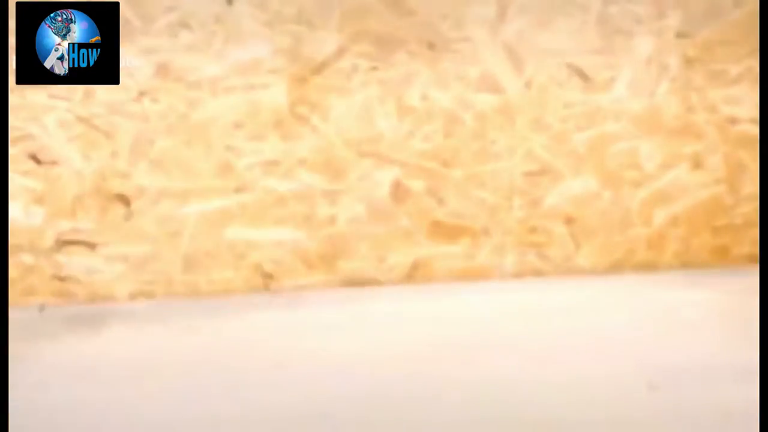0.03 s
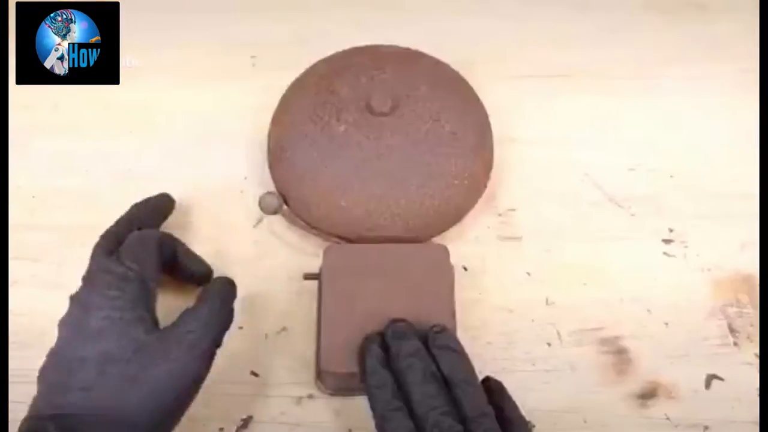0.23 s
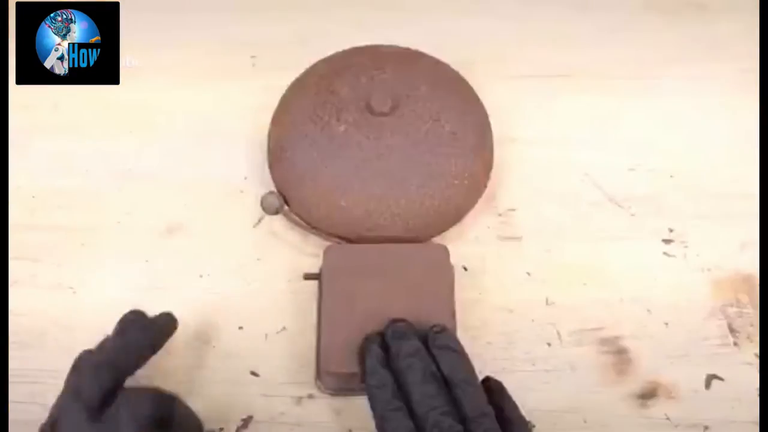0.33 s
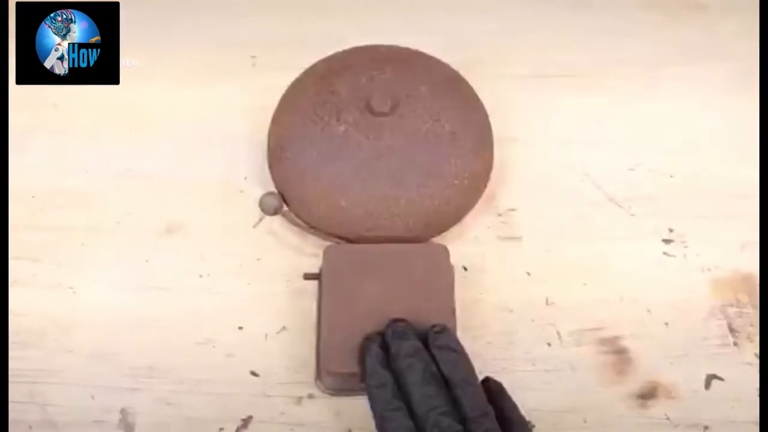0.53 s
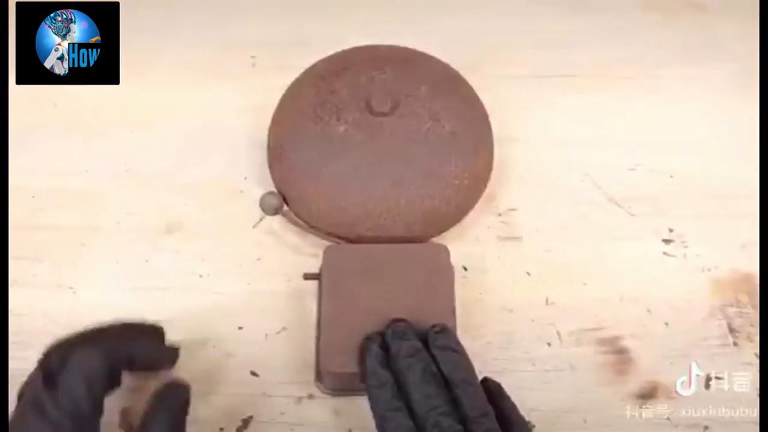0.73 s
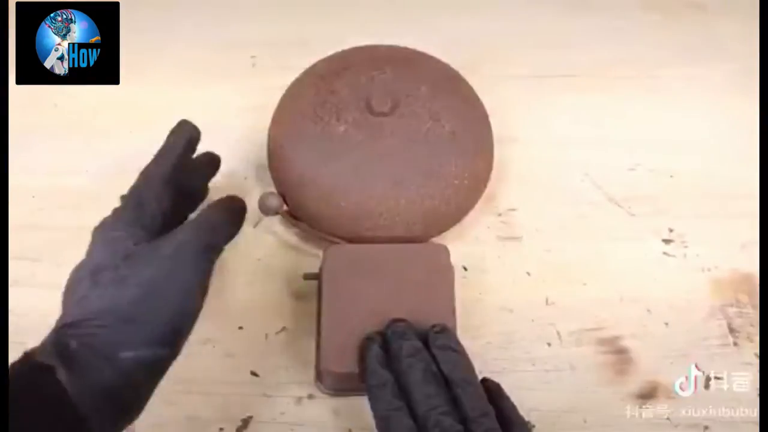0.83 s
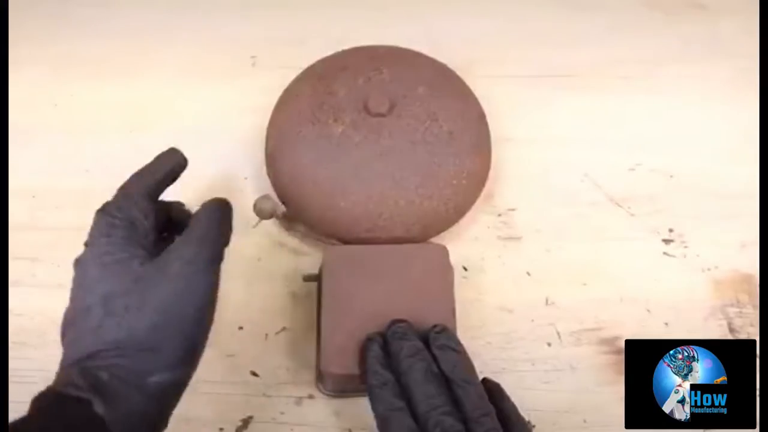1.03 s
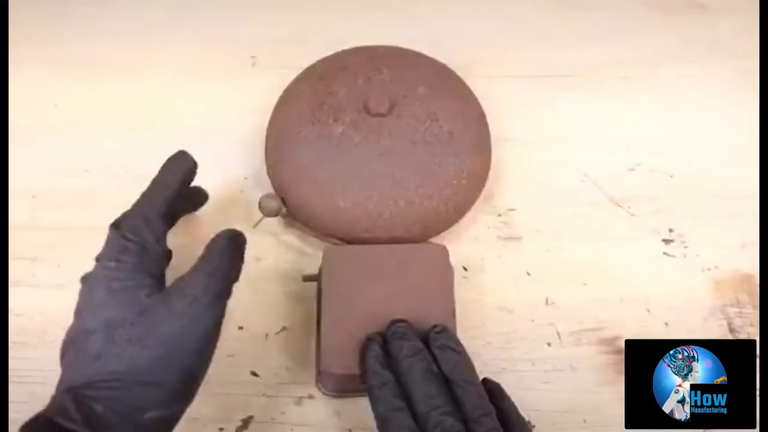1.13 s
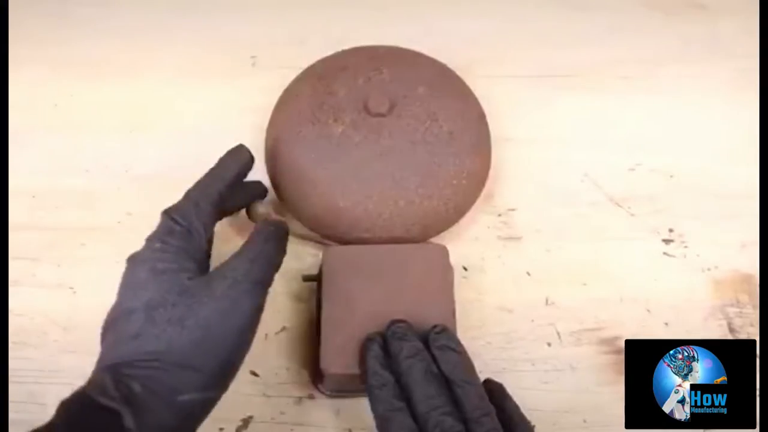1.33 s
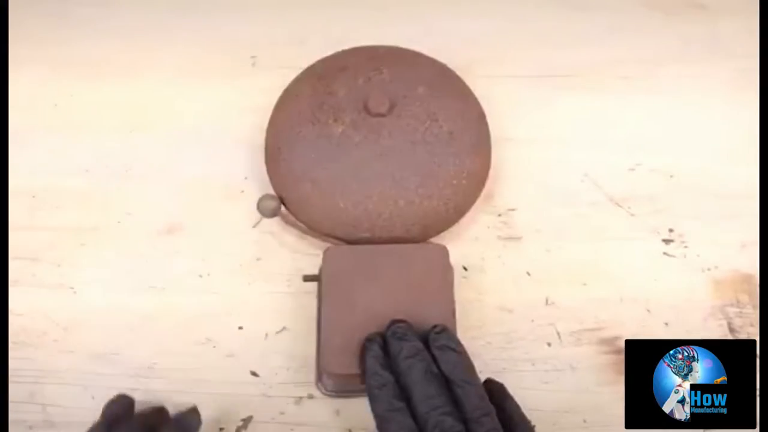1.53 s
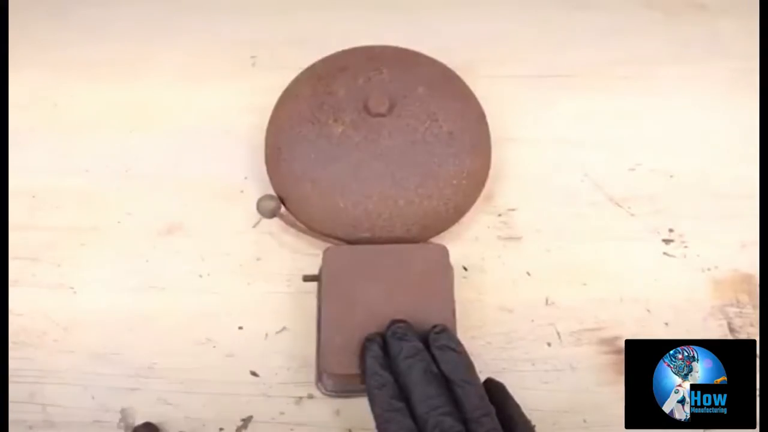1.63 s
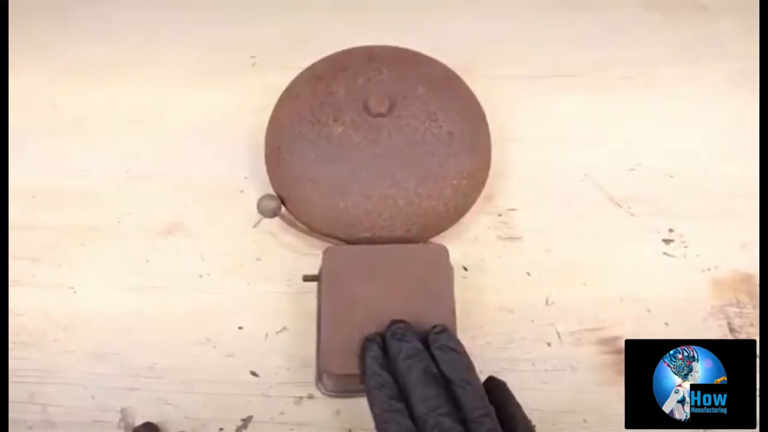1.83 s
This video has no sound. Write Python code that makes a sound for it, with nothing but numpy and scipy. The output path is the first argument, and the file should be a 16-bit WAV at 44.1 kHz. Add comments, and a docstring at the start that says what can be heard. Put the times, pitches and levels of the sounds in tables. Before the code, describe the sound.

A metal bell rings three times as a finger flicks its clapper. One sharp, high strike fades, then two come close together, each followed by a brief rattle of the arm. Close microphone in a workshop with faint hum.

```python
"""A gloved finger brushes the steel gong of an old electric bell, then flicks the clapper three times.
Workshop interior, faint machine hum; the bell lies on a wooden bench, close to a single microphone.
Each flick is a dry knock; the ball hits the gong some 25 ms later, and the sprung arm may rattle on
in its housing. The gong rings in beating pairs of partials, which swell as the limiter behind the
microphone recovers from the blow."""
import sys
import numpy as np
from scipy import signal
from scipy.fft import rfft, irfft
from scipy.io import wavfile

SR = 44100
rng = np.random.default_rng(int(sys.argv[2]) if len(sys.argv) > 2 else 0)


def log_audio(samples):
    """Write samples as a 16-bit WAV file to the path given in sys.argv[1]."""
    # one column per channel
    frames = np.atleast_2d(samples).T
    # limit to full scale, then quantise
    limited = np.clip(frames, -1, 1)
    pcm = np.round(limited * 32767).astype(np.int16)
    wavfile.write(sys.argv[1], SR, pcm)


N = 83790

# noise spectra of the room and of each contact: f/Hz, relative level/dB
ROOM_TONE_COLOUR = [(22, 8.5), (35, -1), (70, 1.5), (130, 1.5), (190, -1.5), (290, 1.5), (370, -2),
                    (480, -5.5), (900, -13.5), (2000, -17), (4500, -25), (9000, -36), (14000, -34.5),
                    (14700, -81)]
GLOVE_COLOUR = [(200, -16), (1500, -13), (5000, -5.5), (8000, -7.5), (13000, -17), (15000, -15)]
CRACK_COLOUR = [(300, 5), (1000, -8), (2300, -6), (3300, -10), (5700, -1.5), (8500, -7.5), (11500, -2.5),
                (14000, 1.5), (14900, -9.5)]
KNOCK_COLOUR = [(300, -25.5), (550, 1.5), (700, 10.5), (1000, -2), (1500, 4.5), (3000, 2), (5000, -0.5),
                (8500, -10), (12000, 2), (13500, 0.5), (14700, -48)]
CLICK_COLOUR = [(400, -9), (1000, -14), (2400, 6), (3500, -5), (5500, 6), (8000, -9.5), (10500, 1),
                (12000, -9), (13500, 5), (14700, -19)]
THUD_COLOUR = [(120, -39), (250, 6), (380, 8), (520, -1.5), (900, 0), (1400, -9), (2300, -2), (3500, -28),
               (6000, -8), (14000, -58)]
# machine hum: f/Hz, level/dB
HUM_TONES = [(181, -66.5), (272, -68), (364, -66)]
# glove rubs: t/s, width/s, level/dB
GLOVE_RUBS = [(.05, 0.083, -64), (.5, 0.011, -63.5), (0.763, 0.0057, -53.5), (.88, 0.1, -65.5),
              (1.086, 0.0034, -42.5), (1.114, 0.00082, -31.5)]
# a faint touch on the gong, then three blows: t/s, ring level/dB, trims/dB (first partial,
# second partial, top two partials, low twins, high twins), contact level/dB
GONG_STRIKES = [(0.14, -31.5, 19.5, 11, -32, -19, -13, -41), (0.2613, 0, -4.5, -5, 0.5, -0.5, -7.5, 3),
                (1.1171, -7.5, -2.5, -6.5, 1.5, 5.5, 3.5, 0.5),
                (1.455, -8.5, -8.5, -4, 10.5, 12.5, -5.5, 7.5)]
# the gong's pairs of partials: f/Hz, twin f/Hz
GONG_PAIRS = [(1528.8, 1486.5), (3880.7, 3919), (6842, 6867), (10224, 10187), (13964, 13936)]
# how each pair rings: level/dB, t60/s, twin's relative level/dB, twin t60/s, swell time/s
GONG_RINGS = [(-37, 3.62, -12.5, 2.6, 0.018), (-25.5, 1.407, 3.5, 0.37, 0.065),
              (-9.5, 0.71, -26.5, 0.88, 0.015), (-14.5, .39, -13, 0.54, 0.0038),
              (-16.5, 0.3, 1.5, .25, 0.00067)]
# the strongest partial wavers: t/s, relative level/dB
MAIN_PARTIAL_WAVER = [(.15, 0.5), (.19, -8.5), (.27, -2.5), (.31, -4), (.345, 2.5), (.43, -2), (.7, -3),
                      (1.125, -5.5), (1.16, 1.5), (1.185, -3.5), (1.207, 7), (1.248, -9), (1.278, 0.5),
                      (1.41, 3), (1.48, -2), (1.533, 9), (1.61, -3.5), (1.65, -9), (1.69, -7), (1.771, -8)]
# modes of the ball on its arm, the flicked arm and the housing: f/Hz, level/dB, t60/s
CLAPPER_MODES = [(2480, -25, 0.11), (7330, -34, 0.11), (9690, -38, 0.33)]
ARM_MODES = [(849, -31.5, 0.049), (1450, -39, 0.12), (1910, -39, 0.013), (2320, -28.5, 0.086),
             (3942, -24, 0.047), (4610, -28.5, 0.024), (4670, -20, 0.0106), (7110, -22.5, 0.049),
             (7490, -24, 0.042), (9634, -16.5, 0.043), (12290, -23, .04)]
HOUSING_MODES = [(208.6, -53, .45), (254.6, -56.5, 0.86), (339, -47, 0.26), (815, -55.5, 0.32)]
# finger on clapper: t/s, level/dB, trim of the arm's low note/dB
FINGER_FLICKS = [(0.2336, -8, -1), (1.0889, -6.5, -3), (1.433, -3, 6.5)]
# the arm rebounds in its housing: t/s, click level/dB, thud level/dB
ARM_REBOUNDS = [(1.1398, 7, -21.5), (1.166, -35, 1), (1.2, -19, -1.5), (1.2315, -16, -6), (1.4796, 5, 9.5),
                (1.506, 0, 6), (1.5383, -7, 3), (1.575, -6.5, -5), (1.614, -20, -17.5), (1.646, -16, -33)]

MAIN_PARTIAL_HZ, CHOKE_S = 6842, 0.004
ARM_NOTE_HZ, ARM_NOTE_DB, ARM_NOTE_T60_S = 667, -30.5, 0.41
KNOCK_LOW_HZ, BELL_LOW_HZ = 646, 560
CONTACT_RISE_S, ROOM_T60_S, ROOM_TOP_HZ = 0.00054, 0.14, 8400
LIMIT_DB, DETECT_S, ATTACK_S, RELEASE_DB_PER_S = -21, 0.0003, 0.0008, 81.5
CUTOFF_HZ = 15100


def from_db(db):
    """Decibels to gain."""
    return 10 ** (np.asarray(db) / 20)


def since(s):
    """Seconds since an event, zero before it."""
    return np.maximum(np.arange(N) / SR - s, 0)


def fade(t, t60):
    """Exponential decay, 60 dB in t60 seconds."""
    return np.exp(-np.minimum(np.log(1000) * t / t60, 60))


def ring(t, hz, t60):
    """A struck mode."""
    return np.sin(2 * np.pi * hz * t) * fade(t, t60)


def modes(table, s):
    """All modes of a part struck at time s, in alternating signs."""
    t = since(s)
    return sum((-1) ** k * from_db(db) * ring(t, hz, t60) for k, (hz, db, t60) in enumerate(table))


def noise(colour):
    """Noise of a given colour, rms 1."""
    hz, db = np.transpose(colour)
    bins_hz = np.maximum(np.arange(N // 2 + 1) * SR / N, 1)
    gain = from_db(np.interp(np.log(bins_hz), np.log(hz), db))
    x = irfft(rfft(rng.standard_normal(N)) * gain, N)
    return x / x.std()


def lag(x, seconds):
    """One-pole smoothing."""
    pole = np.exp(-1 / (seconds * SR))
    return signal.lfilter([1 - pole], [1, -pole], x)


def low_cut(x, hz):
    """Steep high-pass."""
    return signal.sosfilt(signal.butter(4, hz, "high", fs=SR, output="sos"), x)


def contacts(hits, colour, low_hz, t60, room_db):
    """Hits (t/s, level/dB) reach the microphone as dense, quickly dying noise with a duller room tail."""
    direct_power, tail_power = 0, 0
    for s, db in hits:
        t = since(s)
        onset = from_db(db) * (1 - np.exp(-t / CONTACT_RISE_S))
        direct_power += (onset * fade(t, t60)) ** 2
        tail_power += (onset * fade(t, ROOM_T60_S)) ** 2
    dulling = signal.butter(2, ROOM_TOP_HZ, fs=SR, output="sos")
    room = signal.sosfilt(dulling, np.sqrt(tail_power) * noise(colour))
    direct = np.sqrt(direct_power) * noise(colour)
    return low_cut(direct + from_db(room_db) * room, low_hz)


def workshop():
    """Low room tone with a faint machine hum."""
    hum = sum(from_db(db) * np.sin(2 * np.pi * (hz * since(0) + rng.random())) for hz, db in HUM_TONES)
    return from_db(-55) * noise(ROOM_TONE_COLOUR) + hum


def glove():
    """The glove rubs over the bell in short, soft swishes."""
    t = since(0)
    rubs = sum(from_db(db) * np.exp(-0.5 * ((t - s) / width) ** 2) for s, width, db in GLOVE_RUBS)
    return rubs * noise(GLOVE_COLOUR)


def gong():
    """Each blow chokes the old ring and starts a new one: five partials, each beating with a twin."""
    out = 0
    ends = [s for s, *_ in GONG_STRIKES[1:]] + [N / SR]
    waver = from_db(np.interp(since(0), *np.transpose(MAIN_PARTIAL_WAVER)))
    for strike, end in zip(GONG_STRIKES, ends):
        s, ring_db, first_db, second_db, top_db, low_twins_db, high_twins_db, _ = strike
        t = since(s)
        choke = np.exp(-since(end) / CHOKE_S)
        trims_db = [first_db, second_db, 0, top_db, top_db]
        for (hz, twin_hz), ringing, trim_db in zip(GONG_PAIRS, GONG_RINGS, trims_db):
            db, t60, twin_db, twin_t60, swell_s = ringing
            twin_db += low_twins_db if hz <= MAIN_PARTIAL_HZ else high_twins_db
            pair = ring(t, hz, t60) + from_db(twin_db) * ring(t, twin_hz, twin_t60)
            if hz == MAIN_PARTIAL_HZ:
                pair *= waver
            swell = 1 - 0.57 * np.exp(-t / swell_s)
            out += from_db(ring_db + db + trim_db) * pair * swell * choke
    return out


def ball():
    """The ball cracks against the rim and rings briefly on its arm."""
    hits = [(s, contact_db) for s, *_, contact_db in GONG_STRIKES]
    cracks = contacts(hits, CRACK_COLOUR, BELL_LOW_HZ, t60=0.014, room_db=-17)
    return from_db(-11.5) * cracks + sum(from_db(db) * modes(CLAPPER_MODES, s) for s, db in hits)


def flicks():
    """The fingertip knocks the arm, whose low note dies quickly once the ball lands."""
    tones = 0
    for (s, db, note_db), (landing_s, *_) in zip(FINGER_FLICKS, GONG_STRIKES[1:]):
        note = from_db(ARM_NOTE_DB + note_db) * ring(since(s), ARM_NOTE_HZ, ARM_NOTE_T60_S)
        damping = fade(since(landing_s), t60=0.07)
        tones += from_db(db) * (note * damping + modes(ARM_MODES, s))
    hits = [(s, db) for s, db, _ in FINGER_FLICKS]
    knocks = contacts(hits, KNOCK_COLOUR, KNOCK_LOW_HZ, t60=0.018, room_db=-11.5)
    return from_db(-14) * knocks + low_cut(tones, KNOCK_LOW_HZ)


def rattles():
    """The swinging arm clicks, thuds and pings on its stop; this and the blows shake the housing."""
    click_hits = [(s, db) for s, db, _ in ARM_REBOUNDS]
    thud_hits = [(s, db) for s, _, db in ARM_REBOUNDS]
    blows = [(s, contact_db + 5) for s, *_, contact_db in GONG_STRIKES]
    clicks = contacts(click_hits, CLICK_COLOUR, BELL_LOW_HZ, t60=0.015, room_db=-14.5)
    thuds = contacts(thud_hits, THUD_COLOUR, low_hz=160, t60=0.035, room_db=-1)
    ping_hz = CLAPPER_MODES[0][0]
    pings = sum(from_db(db) * ring(since(s), ping_hz, t60=0.074) for s, db in thud_hits)
    housing = sum(from_db(db) * modes(HOUSING_MODES, s) for s, db in thud_hits + blows)
    return from_db(-26.5) * clicks + from_db(-40) * thuds + from_db(-34.5) * pings + housing


def scene():
    """At the microphone, in mono: the bell up close, the workshop behind it."""
    bell = low_cut(gong() + ball(), BELL_LOW_HZ)
    return (bell + flicks() + rattles() + glove() + workshop())[None]


def record(dry):
    """A limiter lets a blow's first millisecond through, ducks and recovers slowly; the top is cut."""
    level_db = 10 * np.log10(lag(dry[0] ** 2, DETECT_S) + 1e-12)
    excess_db = np.maximum(level_db - LIMIT_DB, 0)
    recovery_db = RELEASE_DB_PER_S * since(0)
    duck_db = np.maximum.accumulate(excess_db + recovery_db) - recovery_db
    limited = dry * from_db(-lag(duck_db, ATTACK_S))
    high_cut = signal.cheby2(14, 50, CUTOFF_HZ, fs=SR, output="sos")
    return signal.sosfilt(high_cut, limited)


dry = scene()
out = record(dry)
log_audio(out)
```